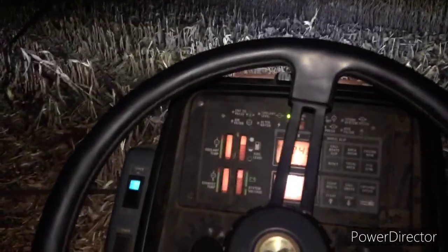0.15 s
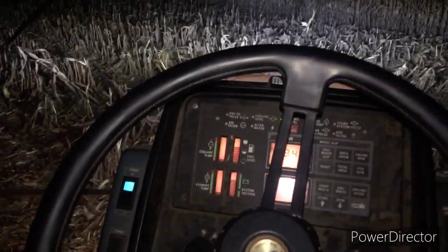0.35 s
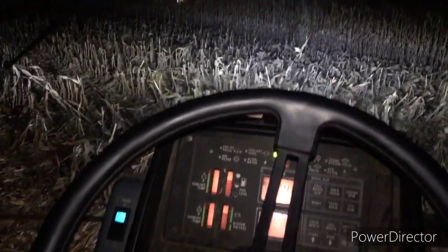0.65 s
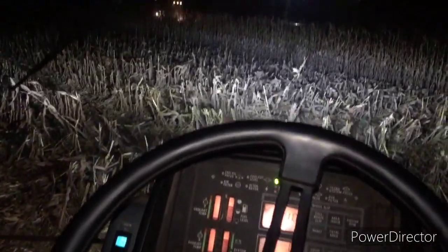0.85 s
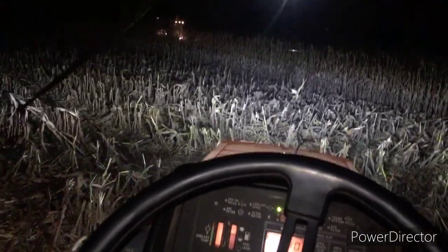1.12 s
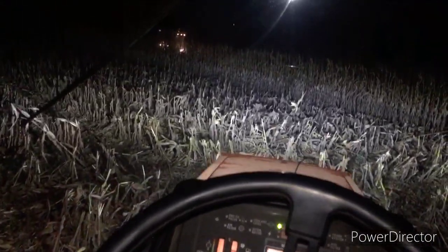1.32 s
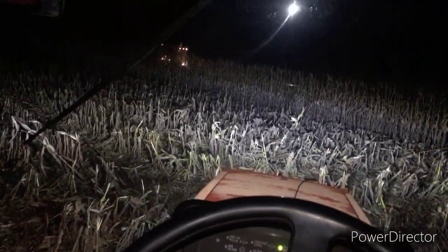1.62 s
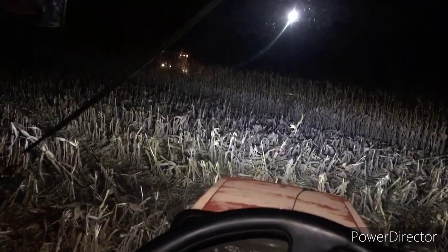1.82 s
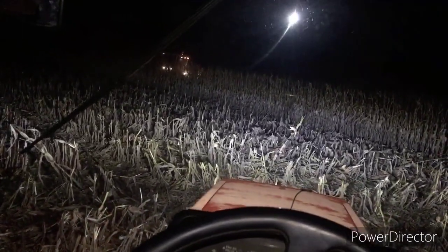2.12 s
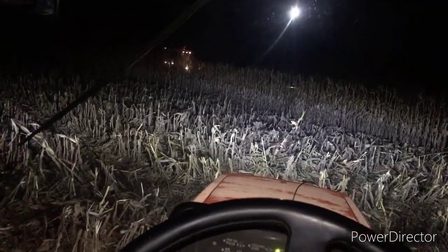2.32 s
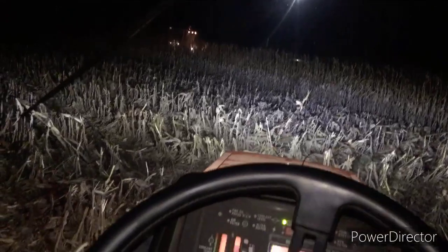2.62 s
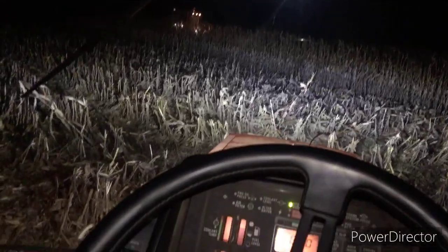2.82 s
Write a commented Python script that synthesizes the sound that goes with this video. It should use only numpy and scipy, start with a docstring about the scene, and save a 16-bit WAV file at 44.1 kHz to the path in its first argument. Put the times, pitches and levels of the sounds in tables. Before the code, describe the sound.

A tractor diesel engine idles with a low, loping drone, heard inside the closed cab.

```python
"""Inside a closed tractor cab, microphone at the driver's seat, the six-cylinder diesel idling.
The firings make the cab boom; one cylinder knocks harder than the rest, so drone and clatter
lope once per engine cycle. A pump whines along and panels ring faintly over cab rumble and
fan hiss. Close by, loose parts tick and something light brushes once."""
import sys
import numpy as np
from scipy import signal
from scipy.fft import rfft, irfft
from scipy.io import wavfile

SR = 44100
rng = np.random.default_rng(int(sys.argv[2]) if len(sys.argv) > 2 else 0)


def unload_audio(sound):
    """Save the sound as a 16-bit wav file, at the path given as the first command line argument."""
    columns = np.transpose(np.atleast_2d(sound))
    # keep every value between -1 and 1, then stretch to whole-number steps
    steps = np.round(np.clip(columns, -1, 1) * 32767)
    wavfile.write(sys.argv[1], SR, steps.astype(np.int16))


N = 130095

# The cylinders in firing order, heard from the seat: boom_db, boom_late_s, knock_db
CYLINDERS = [(-22.5, 0.000023, 3.1), (-20.5, 0.0002, -2.5), (-24, .0003, -2), (-20, 0.00124, -10),
             (-21.5, -.0002, -12.5), (-17.5, -.0002, -3)]
FIRING_HZ, FIRST_FIRING_S = 42.253, .0087
CYCLE_S = len(CYLINDERS) / FIRING_HZ


def boom(t, low_edge_hz=25.5):
    """The cab air swings once per firing, each cylinder with its own strength and timing."""
    db, late_s = signal.resample(np.array(CYLINDERS)[:, :2], 4096).T
    cycle_t = np.linspace(0, CYCLE_S, len(db), endpoint=False)
    angle = 2 * np.pi * FIRING_HZ * (cycle_t - late_s)
    # a quick rise to a pointed crest
    overtones = from_db(-19) * np.cos(3 * angle) - from_db(-17) * np.sin(2 * angle)
    swing = rfft(np.sqrt(2) * from_db(db) * (np.cos(angle) + overtones))
    hz = np.arange(len(swing)) / CYCLE_S
    cycle = irfft(swing / (1 + (low_edge_hz / (hz + 1)) ** 12))  # the slowest sway is lost
    return np.interp(t, cycle_t, cycle, period=CYCLE_S)


def knocks(t, bed, scatter_db, delay_s=.0005, attack_s=.011, decay_s=.024):
    """Envelope of the combustion knocks over a steady bed, t from the first firing; rms 1."""
    power = np.full(len(t), bed ** 2)
    for k in range(-len(CYLINDERS), int(t[-1] * FIRING_HZ) + 1):
        age = np.maximum(t - k / FIRING_HZ - delay_s, 0)
        strength = from_db(CYLINDERS[k % len(CYLINDERS)][2] + scatter_db * rng.standard_normal())
        power += (strength * strike(age, attack_s, decay_s)) ** 2
    return rms_one(np.sqrt(power))


def strike(age, attack_s, decay_s):
    """Envelope of one blow: a straight rise, then an exponential fall."""
    return np.minimum(age / attack_s, 1) * np.exp(-np.maximum(age - attack_s, 0) / decay_s)


# Strong tones of the drone that fills the cab: multiple_of_cycle_rate, level_db
DRONE_TONES = [(10, -55), (11, -47.5), (15, -48.5), (17, -51.5), (20, -54), (22, -45.5), (24, -50.5),
               (27, -56.5), (28, -46.5), (29, -56.5), (32, -51), (33, -56.5), (34, -49), (36, -51.5),
               (38, -45), (39, -48.5), (40, -53), (42, -59), (45, -53), (47, -53), (48, -53.5), (50, -52),
               (51, -52), (54, -48.5), (70, -51.5), (72, -52.5), (117, -53.5), (120, -53), (123, -48),
               (129, -52.5), (135, -47.5), (137, -53.5), (148, -59.5), (183, -57), (201, -54), (249, -57.5)]
# The weaker tones between them: pitch_hz, level_db_per_tone
WEAK_TONES = [(30, -85), (90, -70), (150, -64.5), (250, -60.5), (420, -58.5), (600, -64.5), (730, -65),
              (930, -62), (1300, -64), (1800, -71.5), (2400, -74), (3200, -93.5)]


def drone(t, thump_s=.0125, thump_top_hz=225, jitter_s=.0001, fade_db_per_s=.48):
    """Block and panels answer the knocks alike in every engine cycle: a dense comb of tones."""
    cycle_t = np.linspace(0, CYCLE_S, 8192, endpoint=False)
    answer = rfft(rng.standard_normal(len(cycle_t)) * knocks(cycle_t, bed=1.7, scatter_db=1.0))
    hz = np.arange(len(answer)) / CYCLE_S
    # the hardest knock pulls the low tones into one thump
    thump = -from_db(3.5) * np.exp(-2j * np.pi * hz * thump_s) / (1 + (hz / thump_top_hz) ** 4)
    phases = np.angle(answer / np.sqrt(len(cycle_t)) + thump)
    in_band = (hz > 0) & (hz < WEAK_TONES[-1][0])
    gains = gain_at(WEAK_TONES, hz) * rms_one(np.abs(answer) ** 1.44) * in_band
    for multiple, db in DRONE_TONES:
        gains[multiple] = from_db(db)
    cycle = irfft(gains * np.exp(1j * phases)) * len(cycle_t) / np.sqrt(2)
    crank_t = t + jitter_s * drift(4.2)  # the crank turns unevenly
    fade = from_db(fade_db_per_s * (t.mean() - t))  # eases as the microphone is raised
    return np.interp(crank_t, cycle_t, cycle, period=CYCLE_S) * fade


# Injectors and valves, heard through the cab wall: frequency_hz, level_db_per_hz
CLATTER_SPECTRUM = [(250, -89.5), (550, -68.5), (720, -71.5), (930, -68), (1250, -72), (1600, -70.5),
                    (2000, -75), (2350, -77), (2650, -84.5), (3100, -90), (4200, -93), (7000, -106),
                    (12000, -125)]
# Panels and thin metal parts around the seat: pitch_hz, width_hz, level_db
METAL_RINGS = [(602, 20, -53.5), (870, 15, -51.5), (955, 20, -49.5), (2320, 17, -58.5), (5730, 32, -72),
               (6030, 64, -71.5), (6300, 23, -80), (7290, 51, -76), (9250, 200, -87)]


def clatter(t):
    """Gritty diesel clatter, new with every knock, and the metal parts that ring with it."""
    grit = noise(CLATTER_SPECTRUM) * rms_one(from_db(.86 * drift(170)))
    rings = sum(from_db(db) * resonant_noise(hz, width) for hz, width, db in METAL_RINGS)
    return (grit + rings) * knocks(t, bed=.76, scatter_db=.9)


# The pump's whine, from inside the cab: harmonic, level_db
PUMP_TONES = [(2, -38), (4, -48), (5, -49.5), (7, -52)]
# How loud the whine reaches the moving microphone: time_s, level_db
PUMP_SWELL = [(0, 0), (.45, 2), (1.0, 1), (1.3, -2.5), (1.55, 1.5), (1.85, -2.5), (2.1, -.5), (2.95, -1)]


def pump_and_gear(t, pump_hz=148.2, gear_hz=1157, gear_db=-50.5, waver_db=.97):
    """Pump and gear tones waver a little with the drive speed; the whine swells and dips as the microphone
    moves through the cab."""
    drive_t = np.cumsum(1 + .00096 * drift(6.6)) / SR
    swell_db = np.interp(t, *np.transpose(PUMP_SWELL))
    tones = [(harmonic * pump_hz, db + swell_db) for harmonic, db in PUMP_TONES]
    whine = 0
    for hz, db in tones + [(gear_hz, gear_db)]:
        gain = np.sqrt(2) * from_db(db + waver_db * drift(6.3))
        whine += gain * np.sin(2 * np.pi * (hz * drive_t + rng.random()))
    return whine


# A cab panel near the microphone, timed within the engine cycle: start_s, level_db
PANEL_SHAKES = [(.0080, -35.5), (.0394, -35.5)]


def panel(t, pitch_hz=598.5, waver_db=1.4):
    """The engine shakes one panel twice per cycle, and it hums briefly each time."""
    hum = 0
    for start_s, db in PANEL_SHAKES:
        age = (t - start_s) % CYCLE_S
        gain = np.sqrt(2) * from_db(db + waver_db * drift(5.9))
        hum += gain * strike(age, attack_s=.0073, decay_s=.014) * np.sin(2 * np.pi * pitch_hz * age)
    return hum


# Loose parts close to the microphone: start_s, level_db, pitch_hz, width_hz, decay_s
TICKS = [(.335, -35.5, 545, 50, 0.064), (.727, -41.5, 2260, 140, 0.042), (1.743, -58, 12000, 7000, .001),
         (1.746, -55.5, 13000, 6500, .006), (2.036, -42, 3560, 600, .003), (2.038, -38, 2600, 700, .008),
         (2.289, -37, 2000, 200, 0.036)]


def loose_parts(t):
    """Light parts tick and ring out, the longer pings with a softer start."""
    ticks = 0
    for start_s, db, hz, width, decay_s in TICKS:
        decays = np.maximum(t - start_s, 0) / decay_s
        envelope = np.minimum(10 * decays, 1) * np.exp(-decays)
        ticks += from_db(db) * resonant_noise(hz, width) * envelope
    return ticks


# A soft brush, close by: peak_s, level_db, pitch_hz, width_hz, half_length_s
BRUSH_SWELLS = [(2.303, -55.5, 6350, 500, 0.02), (2.333, -53.5, 7250, 600, 0.02),
                (2.335, -63, 14300, 2000, .007), (2.366, -54.5, 12200, 8000, 0.026),
                (2.375, -53, 9400, 700, 0.014), (2.40, -62, 12400, 5000, .016)]


def brush(t, grain_db=2.5):
    """Something light brushes once: overlapping swells of grainy hiss that rise in pitch."""
    swish = 0
    for peak_s, db, hz, width, half_s in BRUSH_SWELLS:
        swish += from_db(db) * resonant_noise(hz, width) * np.exp(-((t - peak_s) / half_s) ** 2)
    return swish * rms_one(from_db(grain_db * drift(400)))


# Cab rumble, all around the microphone: frequency_hz, level_db_per_hz
CAB_RUMBLE = [(22, -94), (35, -71), (50, -58), (75, -57), (95, -78), (115, -49.5), (140, -63.5),
              (200, -59.5), (280, -63.5), (360, -70), (550, -66.5), (800, -73.5), (1500, -100)]
# Fan and belts, farther off: frequency_hz, level_db_per_hz
FAN_HISS = [(1500, -100), (3000, -90.5), (4000, -93), (5200, -97), (6200, -97), (7800, -103), (9400, -103),
            (10400, -111), (11700, -109), (13000, -113), (15500, -116)]


def cab_and_fan():
    """The cab rumbles steadily under the even hiss of fan and belts."""
    return noise(CAB_RUMBLE) + noise(FAN_HISS)


def scene():
    """Everything as it reaches the driver's seat, in mono."""
    t = np.arange(N) / SR
    engine_t = t - FIRST_FIRING_S
    engine = boom(engine_t) + drone(engine_t) + panel(engine_t) + clatter(engine_t)
    return (engine + pump_and_gear(t) + cab_and_fan() + loose_parts(t) + brush(t))[None]


def record(dry, cutoff_hz=15750):
    """The highest treble is cut steeply."""
    return signal.sosfiltfilt(signal.ellip(10, .05, 60, cutoff_hz, fs=SR, output="sos"), dry)


def from_db(db):
    """Decibels to gain."""
    return 10 ** (np.asarray(db) / 20)


def rms_one(x):
    """Scale to unit rms."""
    return x / np.sqrt(np.mean(x ** 2) + 1e-20)


def gain_at(spectrum, hz):
    """Read a spectrum's gain on a log-frequency axis."""
    points_hz, db = np.transpose(spectrum)
    return from_db(np.interp(np.log(hz + 1), np.log(points_hz), db))


def noise(spectrum):
    """Noise with the given density; it dies away beyond the ends of the spectrum."""
    hz = np.fft.rfftfreq(N, 1 / SR)
    skirts = np.minimum(1, hz / spectrum[0][0]) * np.minimum(1, spectrum[-1][0] / (hz + 1))
    white = rfft(rng.standard_normal(N))
    return irfft(white * gain_at(spectrum, hz) * skirts ** 2, N) * np.sqrt(SR / 2)


def resonant_noise(centre_hz, width_hz):
    """Noise in one resonance with steep skirts; rms 1."""
    detuning = (np.fft.rfftfreq(N, 1 / SR) - centre_hz) / width_hz * np.sqrt(2)
    return rms_one(irfft(rfft(rng.standard_normal(N)) / np.sqrt(1 + detuning ** 4), N))


def drift(rate_hz):
    """Random wander, mostly slower than rate_hz; rms 1."""
    hz = np.fft.rfftfreq(N, 1 / SR)
    return rms_one(irfft(rfft(rng.standard_normal(N)) * (hz > 0) / (1 + (hz / rate_hz) ** 2), N))


dry = scene()
out = record(dry)
unload_audio(out)
```